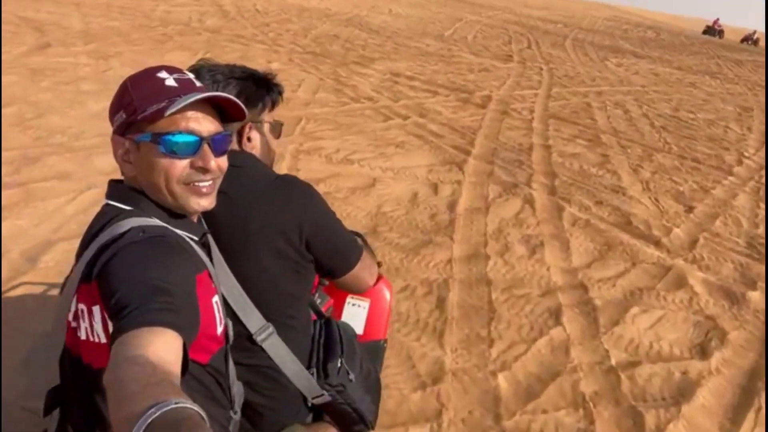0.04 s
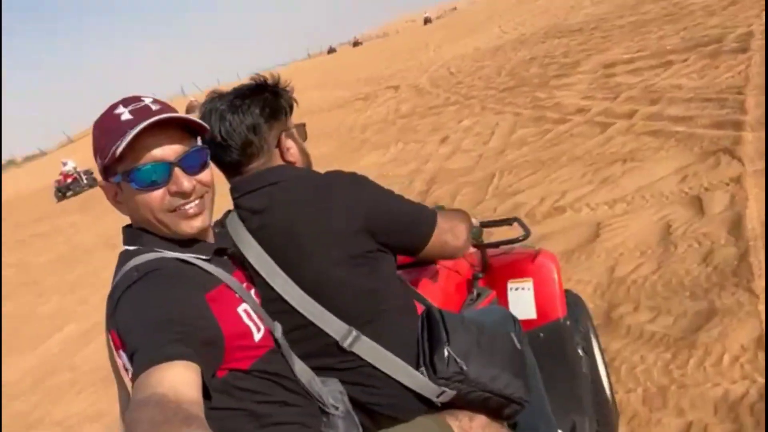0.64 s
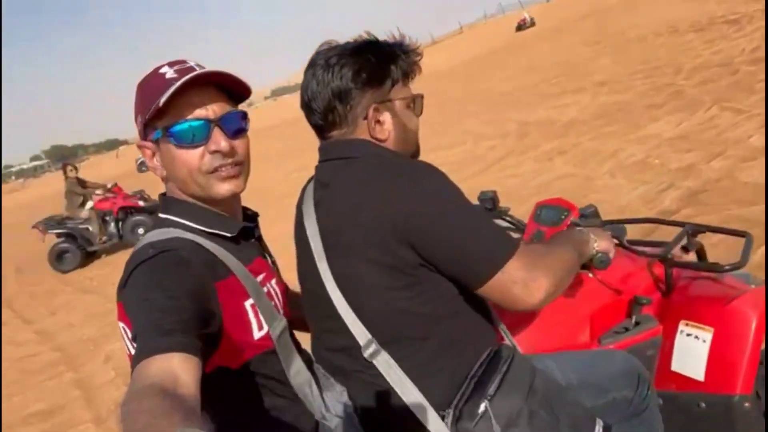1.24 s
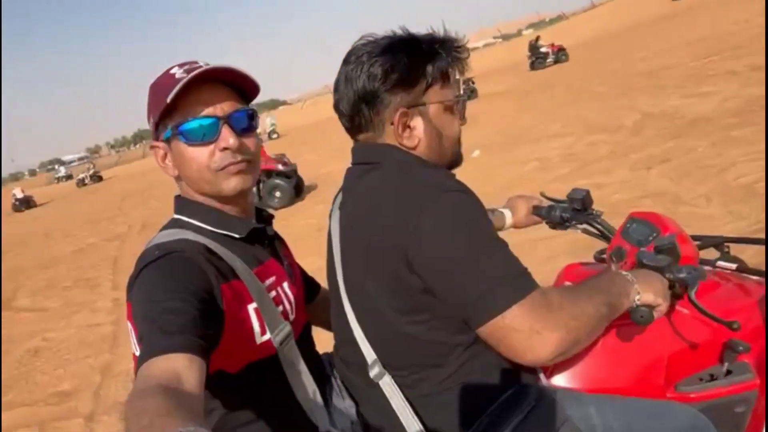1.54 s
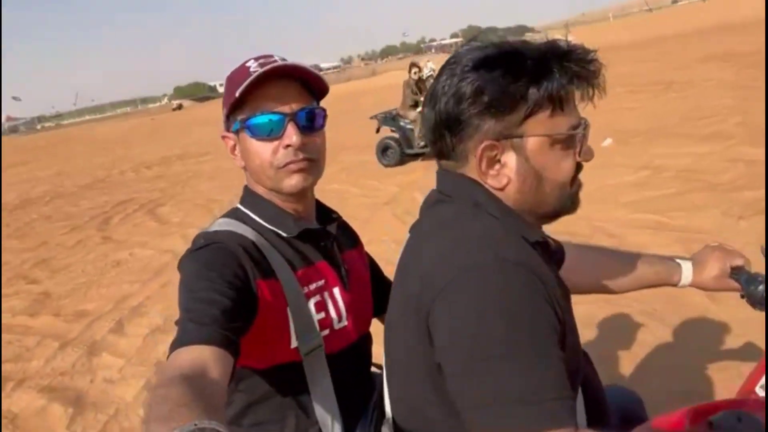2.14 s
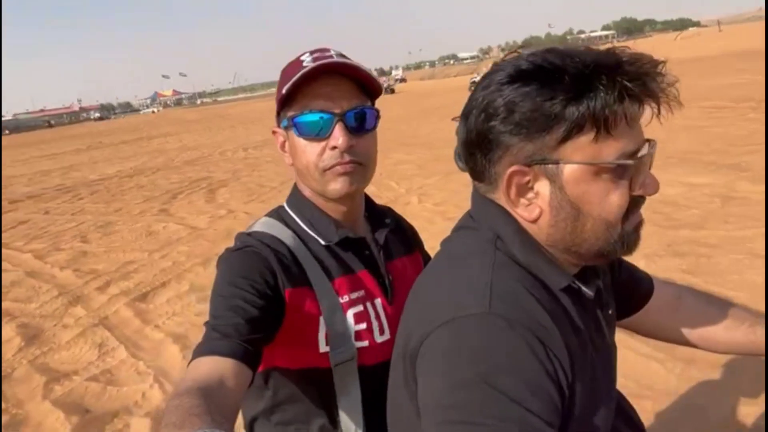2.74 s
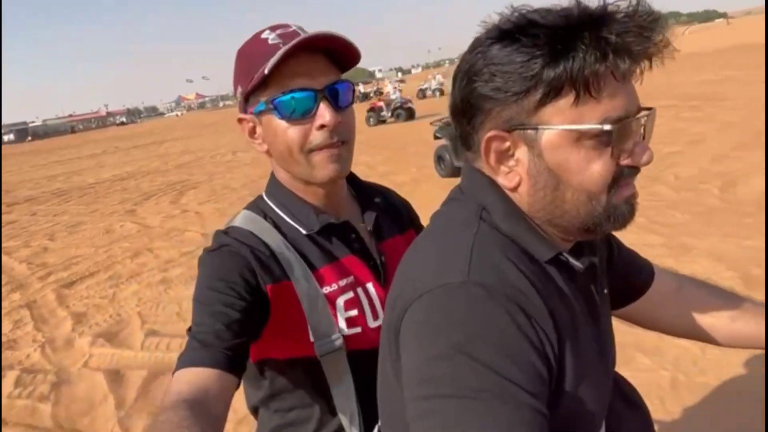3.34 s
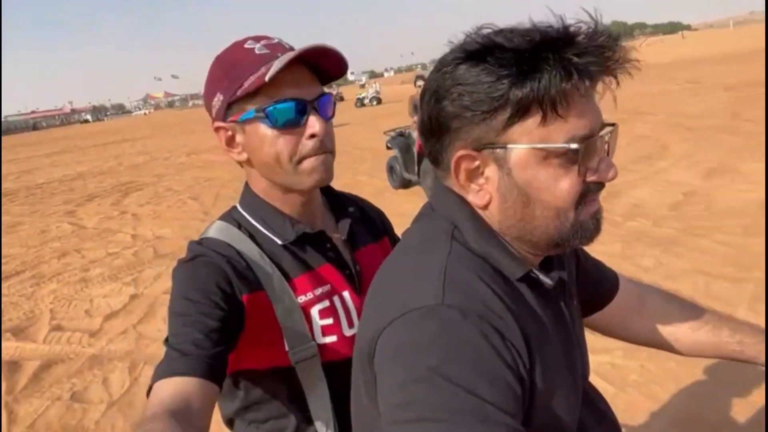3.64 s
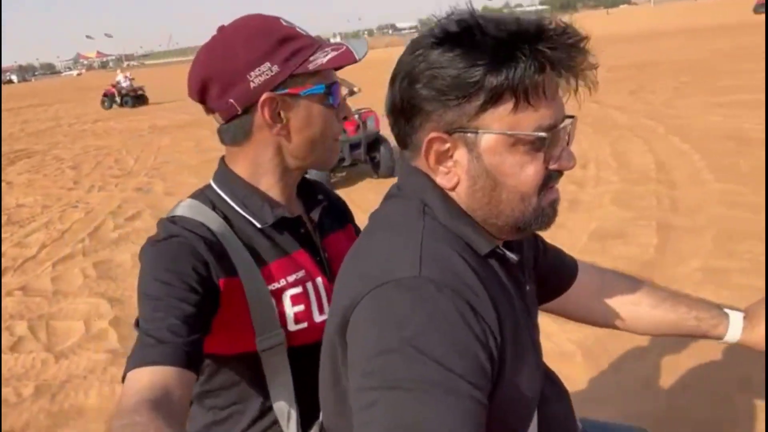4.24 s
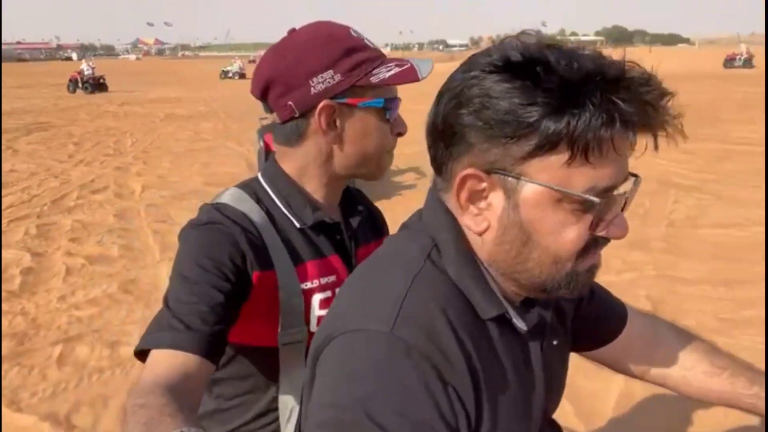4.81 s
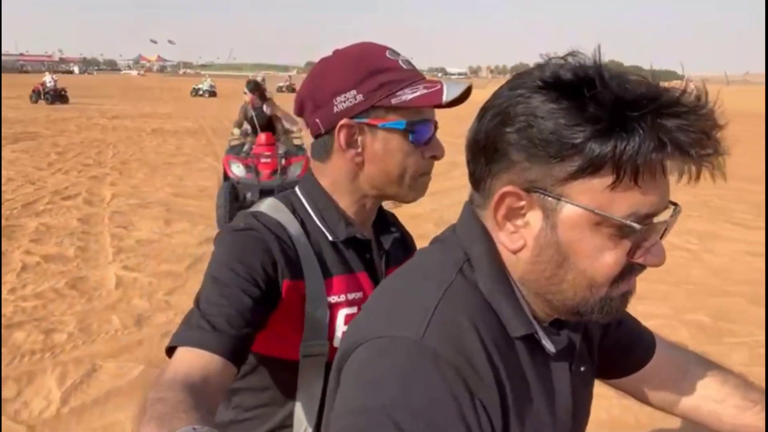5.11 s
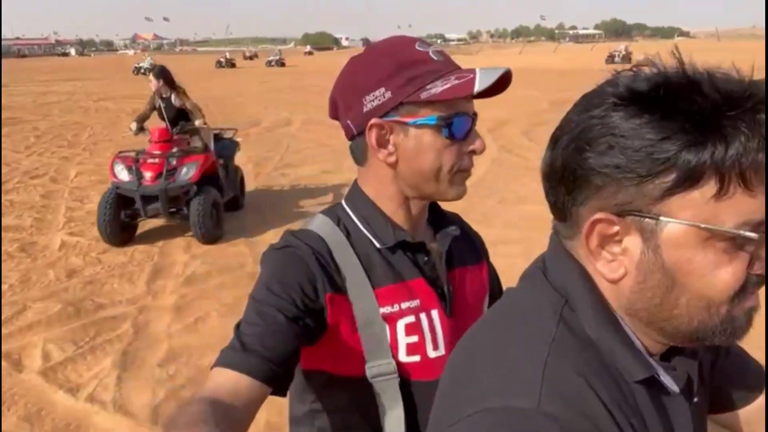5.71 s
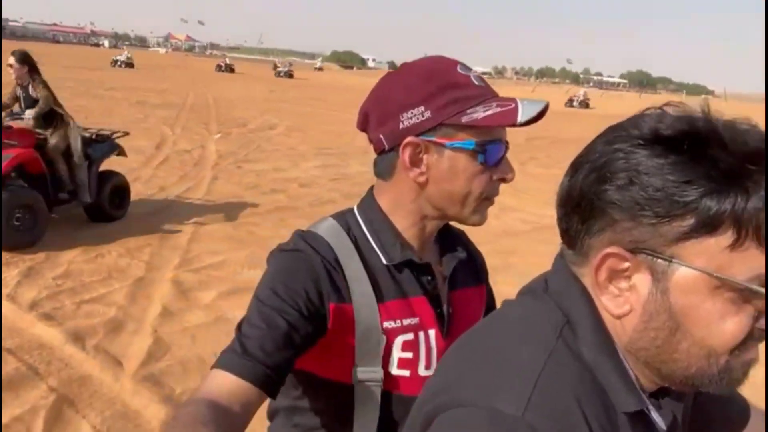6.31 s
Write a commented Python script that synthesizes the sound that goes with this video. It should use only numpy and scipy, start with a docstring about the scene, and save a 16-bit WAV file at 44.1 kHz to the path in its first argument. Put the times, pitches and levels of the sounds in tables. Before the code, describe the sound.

Close, booming quad bike engine with hissing sand and thudding wind, throttling down into irregular firing and light chain rattle.

```python
"""A one-cylinder quad bike picks up speed on desert sand. Each firing booms in the silencer and puffs
from the pipe; valves clatter and ring the cooling fins, sand hisses, and wind thuds on the microphones.
The engine drones, then eases off from about three seconds on, as swirls of air begin to pop.
Another quad draws alongside, the slack chain rattles and a rough gust swells.
Near the end the engine fires unevenly on a closed throttle, and metal fittings chink twice."""
import sys
import numpy as np
from scipy import signal
from scipy.fft import rfft, irfft, next_fast_len
from scipy.io import wavfile
from scipy.ndimage import uniform_filter1d, map_coordinates

SR = 44100
rng = np.random.default_rng(int(sys.argv[2]) if len(sys.argv) > 2 else 0)


def int16_out(signal):
    """Quantize to a 16-bit WAV file."""
    q = np.round(np.clip(np.atleast_2d(signal).T, -1, 1) * 32767)
    wavfile.write(sys.argv[1], SR, q.astype(np.int16))


N = 285327
TIME = np.arange(N) / SR
OPEN_TURN, SEAT_TURN = .73, .01  # where in the engine's cycle the valves open and shut (0-1)

# tone of fluttering air: (frequency [Hz], level [dB])
FLUTTER_SPECTRUM = [(80, -36), (180, -3), (290, -2.5), (420, -7), (650, -16.5), (1300, -28), (3000, -71)]


def amp(db):
    """Turn decibels into a factor to multiply by."""
    return 10 ** (np.asarray(db) / 20)


def unit(x):
    """Scale a signal so that its average level (rms) is 1."""
    return x / np.sqrt(np.mean(x ** 2) + 1e-20)


def along(points, hz):
    """Read a (frequency, value) table between its rows, on a scale of octaves."""
    f, values = np.transpose(points)
    return np.interp(np.log(hz + 1), np.log(f + 1), values)


def curves(rows):
    """Give each column after the time one value per sample."""
    times, *columns = np.transpose(rows)
    return [np.interp(TIME, times, column) for column in columns]


def wobble(rate):
    """A smooth curve through `rate` random values a second."""
    return map_coordinates(rng.standard_normal(int(N * rate / SR) + 4), [np.arange(N) * rate / SR])


def filtered(x, response):
    """Scale and delay each frequency of x as response(frequency) says."""
    size = next_fast_len(N + SR // 2)
    return irfft(rfft(x, size) * response(np.fft.rfftfreq(size, 1 / SR)), size)[..., :N]


def resonances(modes, f):
    """Response of a part that rings at several pitches; along a pipe they alternate in sign."""
    return sum((-1) ** k * amp(db) * 1j * f * width / (hz * hz - f * f + 1j * f * width)
               for k, (hz, width, db) in enumerate(modes))


def shaped(x, spectrum):
    """Give x the tone of a (frequency, level) table."""
    return filtered(x, lambda f: amp(along(spectrum, f)))


def wide_noise(spectrum, alike):
    """Stereo noise; `alike` lists (frequency [Hz], likeness of left and right [-1 to 1])."""
    def response(f):
        angle = np.arccos(np.clip(along(alike, f), -1, 1)) / 2
        return amp(along(spectrum, f)) * [np.cos(angle), np.sin(angle)]
    mid, side = filtered(rng.standard_normal((2, N)), response)
    return unit(np.array([mid + side, mid - side]))


def engine_noise(spectrum, scattered_db):
    """Noise from the engine's direction: one side hears it later, and some bounces off riders and bike."""
    # how much later it reaches the left: (time [s], delay [ms])
    left_delay = [(0, -0.212), (1.3, 0.21), (3.8, 0.37), (4.3, -0.3), (4.9, -0.085), (5.3, 0.23)]
    half_lag = curves(left_delay)[0] * SR / 2000
    direct, *scattered = shaped(rng.standard_normal((3, N)), spectrum)
    pair = np.array([map_coordinates(direct, [np.arange(N) + sign * half_lag]) for sign in (-1, 1)])
    return unit(pair + amp(scattered_db) * np.array(scattered))


def strokes(turn, offset, jitter_ms, scatter_db):
    """One click per engine cycle, `offset` of the way through, varying a little in time and strength."""
    cycles = np.arange(np.ceil(turn[0] - offset), turn[-1] - offset)
    timing, strength = rng.standard_normal((len(cycles), 2)).T
    at = np.interp(cycles + offset, turn, np.arange(N)) + timing * jitter_ms * SR / 1000
    return np.bincount(np.clip(at, 0, N - 1).astype(int), amp(scatter_db * strength), N)


def bursts(clicks, rise_s, decay_s):
    """A loudness curve in which each click swells and dies away."""
    t = np.arange(SR // 8) / SR
    shape = (1 - np.exp(-t / rise_s)) * np.exp(-t / decay_s)
    return unit(signal.fftconvolve(clicks, shape)[:N])


def steady(x):
    """Hold the level at 1, averaged over a few engine cycles."""
    power = uniform_filter1d(uniform_filter1d(x ** 2, size=6000), size=4000)
    return x / np.sqrt(np.abs(power) + 1e-12)


def rung(push, modes):
    """The ringing that a push sets off, held at an even level."""
    return steady(filtered(push, lambda f: resonances(modes, f)))


def silencer_boom(fire, turn):
    """Firings swell through three silencer chambers; the crank shakes the bike, turning twice a firing."""
    # ring of a chamber: (pitch [Hz], width [Hz], level [dB])
    chamber = [(113.55, 34.2, -3)]
    boom = steady(filtered(fire, lambda f: resonances(chamber, f) ** 3))
    shake = amp(-20) * unit(np.sin(2 * np.pi * 2 * turn))
    return boom + shake


def pipe_ring(fire, bark_db, puff_db, uneven):
    """Each jump in pressure rings the pipe: returns the sound of the air inside and of the tinny wall."""
    # low rings, high rings (strong under load), open end and wall: (pitch [Hz], width [Hz], level [dB])
    low_modes = [(232, 84, -11), (266.7, 21.4, 12), (300.3, 23.3, 7.5), (392, 17, 2.5)]
    high_modes = [(451, 11, -1), (620, 26, -25), (667, 19, 6.5), (801, 28, -15.5), (873, 30, 3)]
    mouth_modes = [(238.3, 18.3, 3.5), (282, 31, -8), (423, 22, 0)]
    wall_modes = [(1082, 120, -1), (1627, 53, 6.5), (1940, 14, 11), (2300, 40, 0), (3450, 33, -7)]
    lead_s = .0025  # the jump reaches the pipe before the silencer
    # the valve opens gradually, so the jump has little treble
    jump = filtered(fire, lambda f: np.exp(2j * np.pi * f * lead_s) / (1 + 1j * f / 700) ** 2)
    bark = amp(-14 - 28 * uneven) * rung(jump, high_modes) - rung(jump, low_modes)
    air = amp(bark_db) * bark + amp(puff_db - .5) * rung(jump, mouth_modes)
    wall = amp(puff_db - 10) * rung(jump, wall_modes)
    return air, wall


def gas_puff(burn, puff_db):
    """Gas escapes just before the boom, runs back up the pipe and leaves a second, weaker puff."""
    # tone of the gas: (frequency [Hz], level [dB])
    spectrum = [(150, 10), (350, 7), (700, 4), (1300, -1.5), (2100, -3), (3000, -11), (5000, -11),
                (8000, -19), (11000, -11.5), (12500, -24)]
    echo_s, echo_share = .0092, .45
    escape = strokes(burn, offset=-.06, jitter_ms=.2, scatter_db=1.2)
    puffs = filtered(escape, lambda f: 1 + echo_share * np.exp(-2j * np.pi * f * echo_s))
    blast = unit(bursts(puffs, rise_s=.0035, decay_s=.0046) * amp(1.5 * wobble(500)))
    gas = amp(puff_db) * blast * engine_noise(spectrum, scattered_db=2.5)
    # the treble is aimed backwards, so it fades first
    treble_hz, gone_s = 2800, 1.63
    dull = filtered(gas, lambda f: 1 / (1 + (f / treble_hz) ** 4))
    treble_share = np.clip(1 - (TIME / gone_s) ** 2, 0, 1)
    return dull + treble_share * (gas - dull)


def pipe_growl(fire):
    """Every firing rings the exhaust pipe's dense crowd of pitches the same way, making a growl."""
    # tone of the growl: (frequency [Hz], level [dB])
    spectrum = [(250, 6), (380, 21.5), (500, 22.5), (600, 12), (800, 13.5), (1200, -4), (2200, -47)]
    t, decay_s = np.arange(SR // 8) / SR, .016
    one_ring = rng.standard_normal(len(t)) * np.exp(-t / decay_s)
    ringing = signal.fftconvolve(fire, one_ring)[:N] * amp(2.5 * wobble(90))
    return steady(shaped(ringing, spectrum))


def exhaust(turn):
    """The same firings drive the boom, the pipe's bark, the puff and the growl."""
    # the boom as the throttle opens, holds, eases and closes: (time [s], level [dB])
    throttle = [(0, -20), (.45, -12), (.85, -13.5), (1.2, -11.5), (2.2, -13.5), (2.8, -13), (2.87, -17.5),
                (2.96, -13.5), (3.45, -12.5), (3.53, -15), (4.4, -16.5), (4.51, -24), (4.6, -19),
                (4.88, -18.5), (5.03, -27), (5.62, -28), (6.0, -24), (6.47, -28)]
    # firings that burn extra hard or nearly miss: (time [s], level change [dB])
    odd_firings = [(1.39, -4), (3.81, 3.5), (5.1, -18), (5.175, 5), (5.24, 1), (5.41, 5.5), (5.52, 4),
                   (5.626, 9.5), (5.71, 2), (6.38, 7)]
    # fuel burns less evenly on a light throttle: (time [s], unevenness [0-1])
    unevenness = [(0, .5), (.9, .4), (1.5, .17), (2.4, .2), (3, .5), (4.4, .6), (4.9, .68), (5.1, 1)]
    # the puff fades as the microphones swing away from the pipe: (time [s], level [dB])
    puff_level = [(0, -28), (.9, -32), (1.45, -38), (2.6, -55), (6.47, -44)]
    # balance of boom and bark: (time [s], left above right [dB])
    balance = [(1.2, 0.5), (2.9, 3), (3.8, 1), (4.8, -0.5), (5.3, 1)]
    uneven, puff_db = curves(unevenness)[0], curves(puff_level)[0]
    odd_db = sum(db * np.exp(-((TIME - s) / .03) ** 2) for s, db in odd_firings)
    boom_db = curves(throttle)[0] + odd_db
    full_boom_db = -12.5
    bark_db = -23 + .5 * (boom_db - full_boom_db) - 11 * uneven
    # with little fuel, a firing comes early or late, strong or weak
    burn = turn + .022 * uneven ** 2 * wobble(22)
    fire = strokes(burn, offset=0, jitter_ms=.04, scatter_db=.5)
    fire *= amp((.4 + 2.8 * uneven) * wobble(22))
    boom = amp(boom_db) * silencer_boom(fire, turn)
    air, wall = pipe_ring(fire, bark_db, puff_db, uneven)
    gas = gas_puff(burn, puff_db)
    growl = amp(bark_db - 6.5 - 20 * uneven) * pipe_growl(fire)
    sides = amp(np.outer([.5, -.5], curves(balance)[0]))
    return (boom + air) * sides + wall + gas + growl


def valve_gear(turn):
    """Valves open and shut once a cycle, ringing their cover over the steady rattle of the chain."""
    # loudness of valves and chain: (time [s], level [dB])
    level = [(0, -43.5), (1.1, -41), (1.7, -45.5), (2.2, -42), (5, -48.5), (5.3, -39), (6.47, -45)]
    # tones of the clatter and the cover: (frequency [Hz], level [dB])
    clatter_spectrum = [(200, -44), (450, 10), (800, 15), (1300, 5.5), (2000, 7.5), (2600, 5.5), (3200, -2),
                        (5000, -12.5), (6500, -30), (8300, -66), (11000, -71)]
    cover_spectrum = [(900, -3), (1600, -5), (2050, -6), (2350, -5.5), (2750, -9), (3200, -26), (5000, -34),
                      (8000, -45), (12000, -66)]
    opening = bursts(strokes(turn, OPEN_TURN, jitter_ms=1, scatter_db=2.2), rise_s=.001, decay_s=.008)
    shutting = bursts(strokes(turn, SEAT_TURN, jitter_ms=1.5, scatter_db=2.5), rise_s=.001, decay_s=.01)
    chain = amp(3.7 * wobble(200))
    knocks = unit(chain + .21 * opening + .21 * shutting)
    clatter = amp(3.5) * knocks * engine_noise(clatter_spectrum, scattered_db=-1.5)
    cover = amp(-1.5) * opening * engine_noise(cover_spectrum, scattered_db=-10)
    return amp(curves(level)[0]) * (clatter + cover) * amp([[-.5], [.5]])


def cooling_fins(turn):
    """Each valve blow rings the cooling fins at wavering pitches, heard on the right first."""
    # rings of the fins and casing: (pitch [Hz], width [Hz], level [dB])
    modes = [(1635, 69, 3), (1955, 41, -0.5), (2030, 26, 4.5), (2325, 63, 1), (3585, 95, -10.5),
             (4190, 220, -10.5), (4540, 60, -3)]
    # the fins aim their sound, so the moving microphones favour one pitch after another:
    # (time [s], level [dB], favoured pitch [Hz])
    view = [(0, -57, 2200), (1.1, -40, 2100), (1.6, -40.5, 1930), (2.0, -39.5, 1960), (2.5, -41, 2160),
            (3.2, -41, 1740), (4.0, -41.5, 1820), (5.0, -42, 1800), (5.3, -41, 2300), (5.9, -42.5, 2380),
            (6.47, -37.5, 1920)]
    level_db, favoured_hz = curves(view)
    waver_share, delay_s = .012, .0003
    blows = bursts(strokes(turn, OPEN_TURN, jitter_ms=1.2, scatter_db=3), rise_s=.001, decay_s=.005)
    ring = 0
    for hz, width, db in modes:
        # smooth the noisy blows, then shift them up to this ring's pitch
        pole = np.exp(-np.pi * width / SR)
        push = (blows + .6) * rng.standard_normal((2, N))
        cos_part, sin_part = signal.lfilter([1], np.poly([pole, pole]), push)
        angle = 2 * np.pi * np.cumsum(hz * (1 + waver_share * wobble(9))) / SR
        favour_db = 5 * np.exp(-((hz - favoured_hz) / 190) ** 2) + 2.5 * wobble(9)
        ring += amp(db + favour_db) * unit(cos_part * np.cos(angle) + sin_part * np.sin(angle))
    ring = amp(level_db) * steady(ring)
    return np.array([filtered(ring, lambda f: np.exp(-2j * np.pi * f * delay_s)), ring])


def sand_hiss():
    """Sand sprays from the tyres in a fine, uneven hiss."""
    # loudness of the spray: (time [s], level [dB])
    level = [(0, -40), (2, -38.5), (3.4, -41.5), (4.3, -39.5), (6.47, -38)]
    # its tone: (frequency [Hz], level [dB])
    spectrum = [(300, 0), (700, 20.5), (1500, 22.5), (3200, 12), (5000, 13), (6300, 10.5), (7400, 4),
                (8700, 1), (10000, 1.5), (11500, 3), (12500, -33)]
    # its spread: (frequency [Hz], likeness of left and right [-1 to 1])
    alike = [(500, .1), (1200, .4), (1900, -.4), (3300, .4), (4400, -.25), (5800, .15), (6800, -.35),
             (7600, -.88), (9200, -.88), (10000, .99)]
    # its balance: (frequency [Hz], left above right [dB])
    balance = [(900, -0.5), (3500, -1), (5400, -4.5), (7200, 0)]
    level_db = curves(level)[0] + .6 * wobble(14) + 2.2 * wobble(140)
    hiss = filtered(wide_noise(spectrum, alike), lambda f: amp(np.outer([.5, -.5], along(balance, f))))
    return amp(level_db) * hiss


def wind():
    """Swirls of gusty air hit each microphone separately, as low thuds and a quicker flutter."""
    # loudness of the thuds: (time [s], level [dB])
    thud_level = [(0, -15.5), (1.2, -19.5), (1.75, -27), (2.55, -23), (3.1, -16.5), (4.42, -17.5),
                  (4.57, -33), (4.85, -20.5), (5.15, -26.5), (5.6, -22.5), (5.9, -23), (6.47, -25.5)]
    # their tone: (frequency [Hz], level [dB])
    thud_spectrum = [(15, -48), (28, -13), (45, -15.5), (70, 2), (110, 0), (170, -11.5), (300, -12.5),
                     (700, -82)]
    # loudness of the flutter: (time [s], level [dB], left above right [dB])
    flutter_level = [(0, -28.5, 6.5), (1.2, -28, 1.5), (2.5, -30, 2.5), (3.1, -27, -1.5), (4.42, -25, -1),
                     (4.58, -34, -2), (4.85, -22, 2), (5.15, -28.5, -3), (5.35, -29.5, -8.5),
                     (5.8, -30, -4.5), (6.05, -31, -1), (6.47, -29, -4)]
    # single gusts: (peak time [s], half width [s], thud change [dB], flutter change [dB])
    gusts = [(.05, 0.093, 0.5, -0.5), (2.87, 0.07, 7.5, 6), (3.13, 0.025, 4.5, 0), (3.44, .03, -0.5, 3),
             (3.96, 0.03, -1, 0), (4.05, .035, 2.5, 3.5), (4.3, 0.083, 3, -4), (6.32, .025, -3, 6)]
    thud_db = curves(thud_level)[0]
    flutter_db, left_db = curves(flutter_level)
    for s, width, thud_change, flutter_change in gusts:
        gust = np.exp(-((TIME - s) / width) ** 2)
        thud_db += thud_change * gust
        flutter_db += flutter_change * gust
    swirls = np.array([wobble(22), wobble(22)])
    flaps = np.array([wobble(110), wobble(110)])
    thuds = unit(amp(1.8 * swirls) * wide_noise(thud_spectrum, alike=[(45, .6), (110, .3)]))
    flutter = unit(amp(1.6 * swirls + 2.8 * flaps) * wide_noise(FLUTTER_SPECTRUM, alike=[(300, .05)]))
    return amp(thud_db) * thuds + amp(flutter_db + np.outer([.5, -.5], left_db)) * flutter


def wind_pops():
    """A tight swirl bursts on a microphone: a swing or two of pressure, then a short ragged tail."""
    # bursting swirls: (time [s], level [dB], pitch [Hz], left above right [dB])
    pops = [(2.873, -20, 480, 9), (3.45, -19, 560, 4), (3.947, -18, 480, -4), (4.049, -20, 430, 2),
            (4.97, -18, 470, 3), (5.247, -7.5, 720, -22), (5.3, -16, 560, -12), (5.352, -16, 750, -12),
            (5.538, -18, 800, -8), (5.702, -19, 480, -10), (5.725, -15.5, 600, -12), (5.922, -21, 520, 5),
            (6.309, -14.5, 560, -10)]
    half_width_cycles, tail_s = .7, .012
    out = np.zeros((2, N))
    rough_air = wide_noise(FLUTTER_SPECTRUM, alike=[(300, .0024)])
    for s, db, hz, left_db in pops:
        near = np.abs(TIME - s) < .06
        t = TIME[near] - s
        envelope = np.exp(-(t * hz / half_width_cycles) ** 2)
        swing = envelope * np.cos(2 * np.pi * (hz * t + rng.random((2, 1))))
        tail = amp(-17) * np.clip(t * hz, 0, 1) * np.exp(-np.abs(t) / tail_s) * rough_air[:, near]
        out[:, near] += amp(db + np.minimum(0, [[left_db], [-left_db]])) * (swing + tail)
    return out


def second_quad():
    """Another quad chatters out of step with the first; its sound reaches the left side first."""
    # its approach: (time [s], firings [per s], level [dB])
    approach = [(0, 22, -86), (4.5, 21, -35.5), (5.4, 21.5, -39), (6.47, 21.8, -38.5)]
    # tone of its chatter: (frequency [Hz], level [dB])
    spectrum = [(200, -13), (450, 12.5), (750, 4.5), (1200, -6.5), (1600, -7.5), (2300, -7), (3200, -19),
                (6000, -14), (8300, -27.5), (12000, -68)]
    rate, level_db = curves(approach)
    delay_s = .000432
    fire = strokes(np.cumsum(rate) / SR, offset=0, jitter_ms=1, scatter_db=1.5)
    knocking = bursts(fire, rise_s=.002, decay_s=.013) * amp(2.2 * wobble(170))
    chatter = unit(knocking * shaped(rng.standard_normal(N), spectrum))
    pair = np.array([chatter, filtered(chatter, lambda f: np.exp(-2j * np.pi * f * delay_s))])
    return amp(level_db) * pair * amp([[-.8], [.8]])


def chain_slap():
    """As the engine stops pulling, the slack chain slaps its guard at random."""
    # loudness of the slaps: (time [s], level [dB])
    level = [(0, -72), (3.9, -53), (4.4, -49), (5.1, -56), (5.35, -43.5), (5.9, -49), (6.47, -40.5)]
    # rings of the guard: (pitch [Hz], width [Hz], level [dB])
    guard_modes = [(2164, 160, 0), (2480, 200, 2), (2780, 80, 5)]
    slaps_per_s, scatter_db = 55, 1.8
    slaps = (rng.random(N) < slaps_per_s / SR) * amp(scatter_db * rng.standard_normal(N))
    contact = bursts(slaps, rise_s=.0003, decay_s=.0012) * rng.standard_normal((2, N))
    return amp(curves(level)[0]) * unit(filtered(contact, lambda f: resonances(guard_modes, f)))


def swelling_gust():
    """A rough gust grows on both sides, climbs in pitch at its end and dies quickly."""
    start_s, end_s, rise_s, decay_s = 4.68, 4.97, .17, .025
    envelope = np.clip((TIME - start_s) / rise_s, 0, 1) * np.exp(-np.maximum(TIME - end_s, 0) / decay_s)
    pitch_hz = np.interp(TIME, [end_s - .06, end_s], [300, 440])
    angle = 2 * np.pi * np.cumsum(pitch_hz) / SR

    def rush(width_hz=150):
        roughness = amp(1.5 * wobble(70))
        return roughness * (wobble(width_hz) * np.cos(angle) + wobble(width_hz) * np.sin(angle))
    return amp(-23.5) * envelope * unit(rush() + .7 * np.array([rush(), rush()]))


def metal_chinks():
    """Small metal fittings chink, each with one high note that dies fast."""
    # the chinks: (time [s], level [dB], pitch [Hz])
    chinks = [(5.623, -34, 5400), (6.084, -36, 4950)]
    rise_s, fade_60_db_s = .002, .086
    out, t = np.zeros(N + SR), np.arange(SR // 4) / SR
    for s, db, hz in chinks:
        envelope = amp(db - 60 * t / fade_60_db_s) * (1 - np.exp(-t / rise_s))
        out[round(s * SR):][:len(t)] += envelope * np.sin(2 * np.pi * hz * t)
    return out[:N]


def scene():
    """One engine drives exhaust, valves and fins; the ride adds another quad, sand, wind and rattles."""
    # engine speed: (time [s], firings [per s])
    speed = [(0.0, 18.3), (0.21, 18.76), (0.71, 20.76), (0.83, 22.43), (1.06, 21.76), (1.25, 23.11),
             (1.67, 24.12), (2.56, 23.93), (3.14, 22.81), (3.9, 21.99), (4.64, 20.4), (5.19, 20.02),
             (5.45, 21.76), (6.11, 21.94), (6.47, 22.89)]
    turn = .33 + np.cumsum(curves(speed)[0]) / SR  # counts engine cycles, one per firing
    engine = exhaust(turn) + valve_gear(turn) + cooling_fins(turn)
    surroundings = second_quad() + sand_hiss() + wind() + swelling_gust() + wind_pops()
    return engine + surroundings + chain_slap() + metal_chinks()


def record(dry):
    """Round off the tallest peaks and cut away the highest treble."""
    ceiling, top_hz = .92, 12000
    rounded = dry / (1 + np.abs(dry / ceiling) ** 8) ** (1 / 8)
    return filtered(rounded, lambda f: 1 / np.sqrt(1 + (f / top_hz) ** 80))


dry = scene()
out = record(dry)
int16_out(out)
```